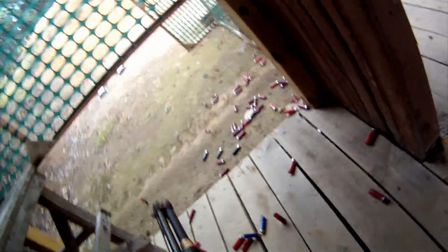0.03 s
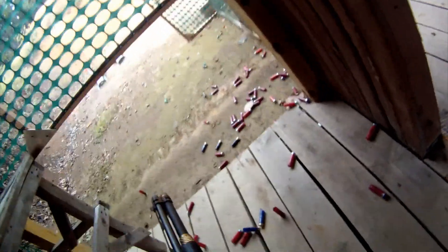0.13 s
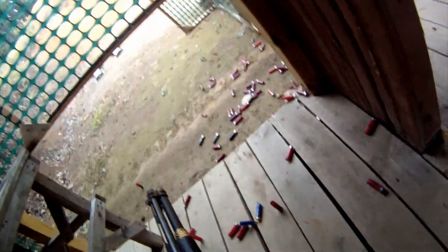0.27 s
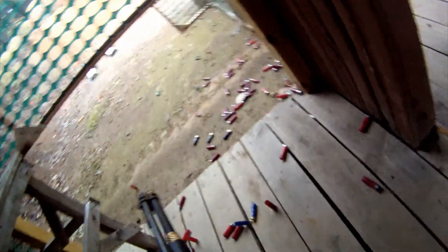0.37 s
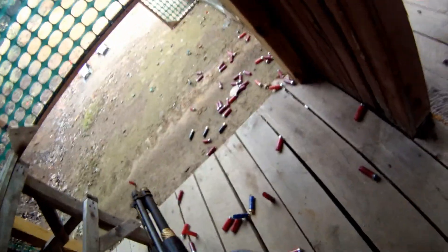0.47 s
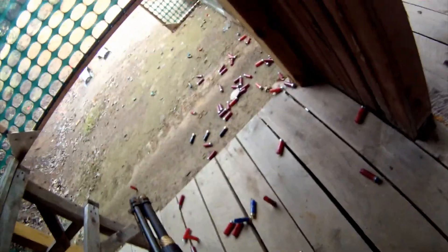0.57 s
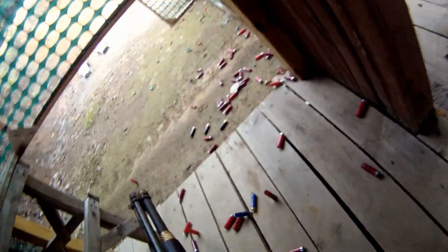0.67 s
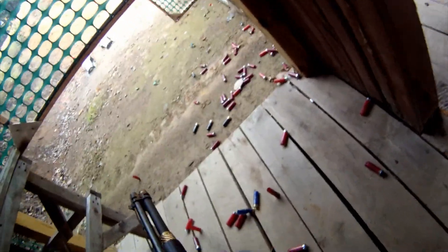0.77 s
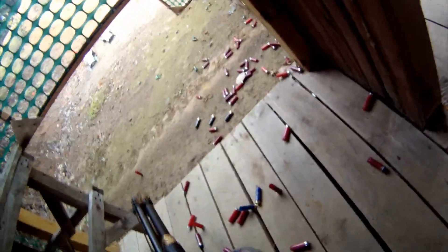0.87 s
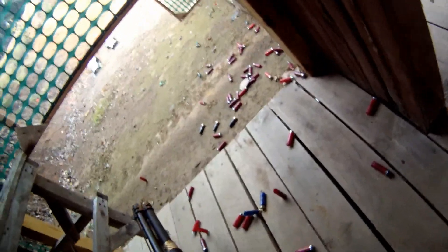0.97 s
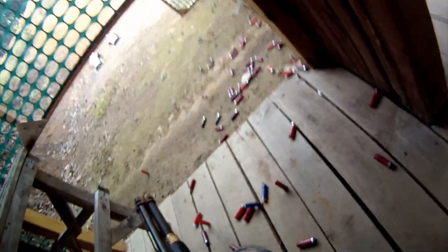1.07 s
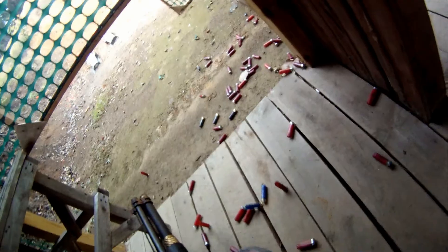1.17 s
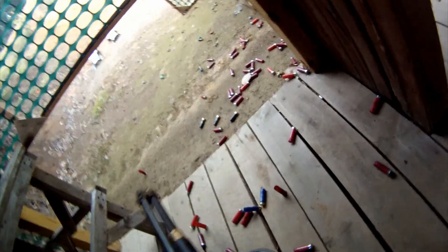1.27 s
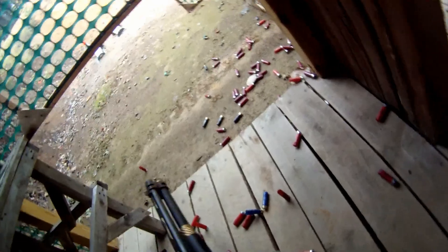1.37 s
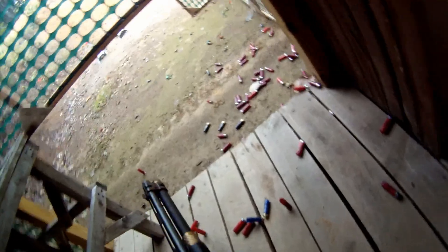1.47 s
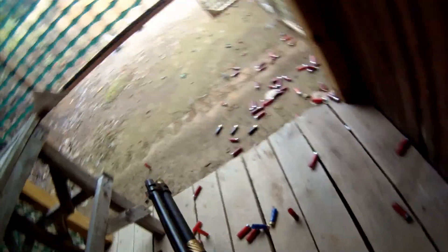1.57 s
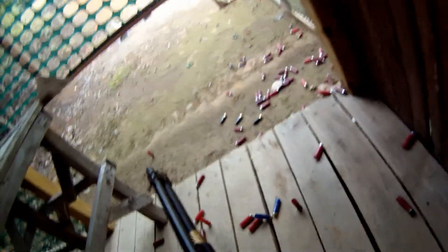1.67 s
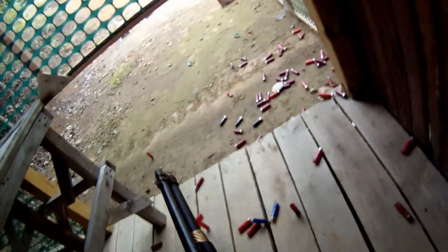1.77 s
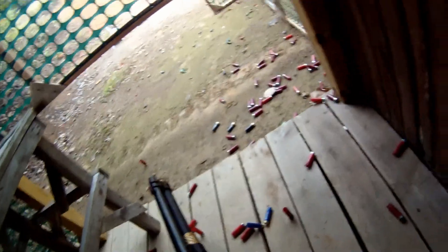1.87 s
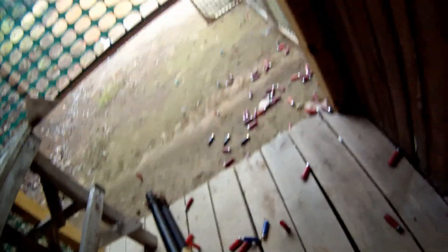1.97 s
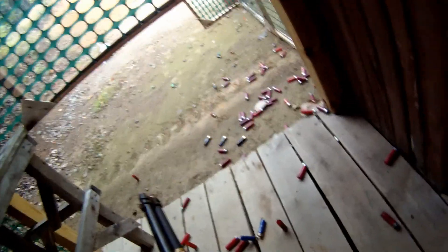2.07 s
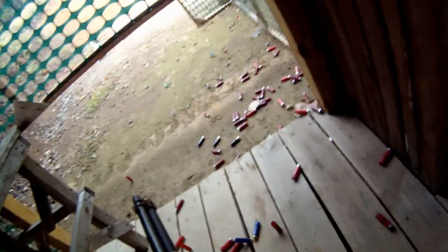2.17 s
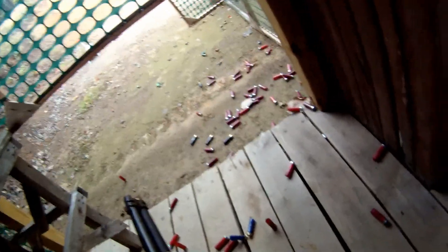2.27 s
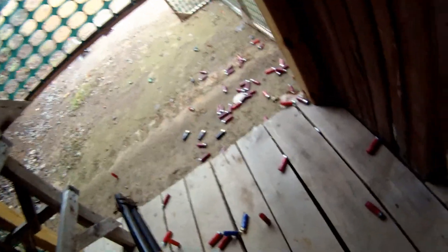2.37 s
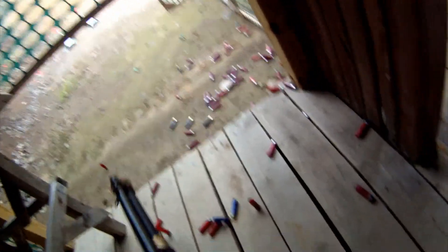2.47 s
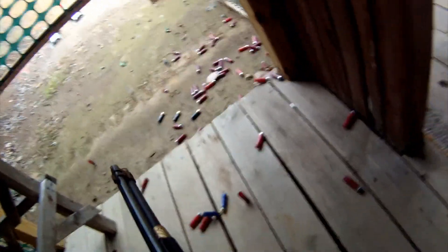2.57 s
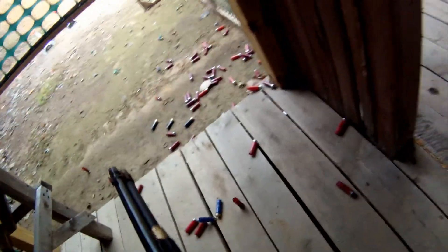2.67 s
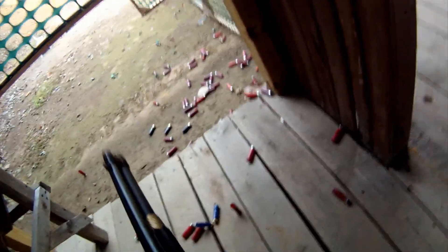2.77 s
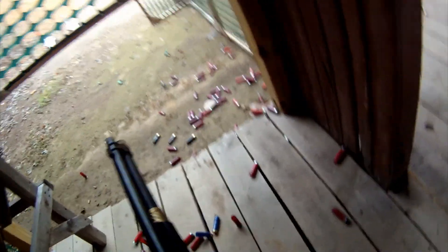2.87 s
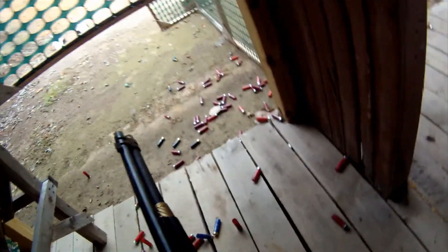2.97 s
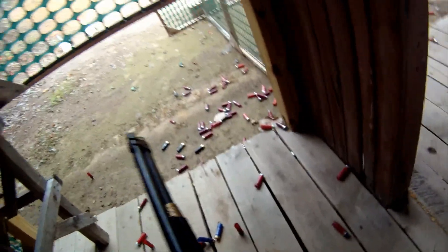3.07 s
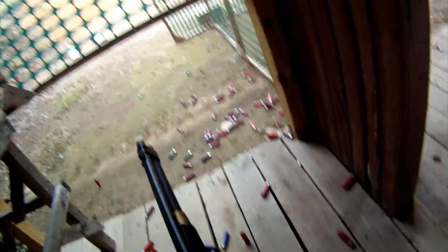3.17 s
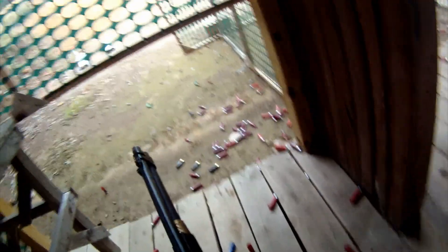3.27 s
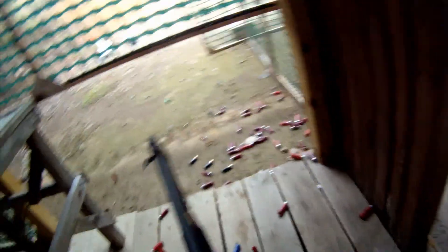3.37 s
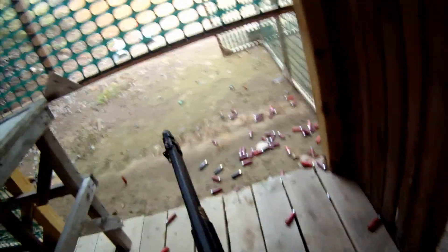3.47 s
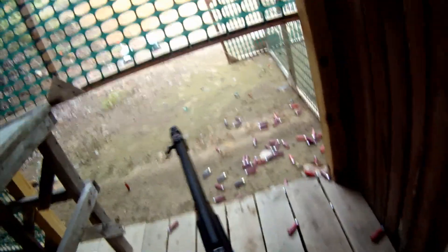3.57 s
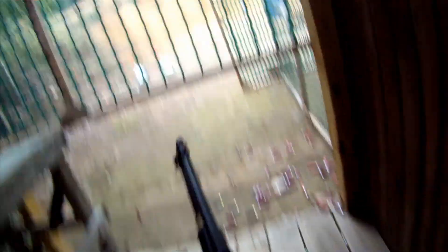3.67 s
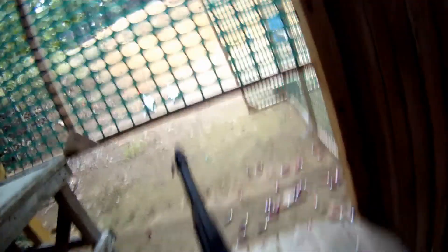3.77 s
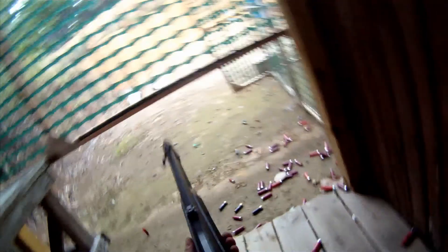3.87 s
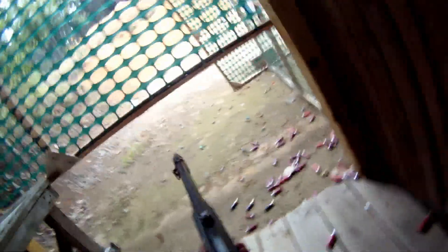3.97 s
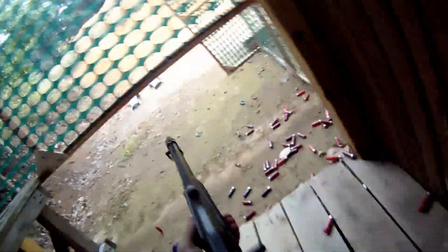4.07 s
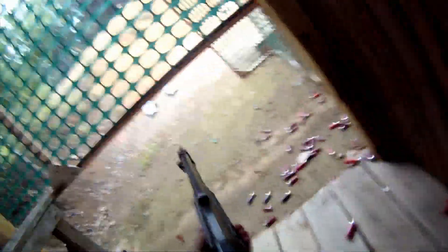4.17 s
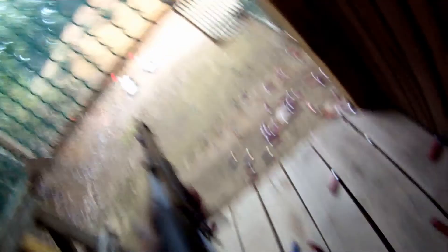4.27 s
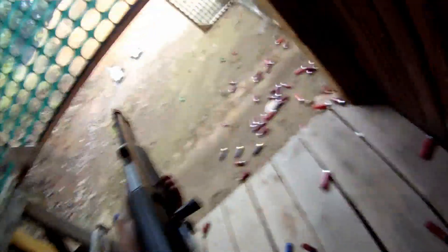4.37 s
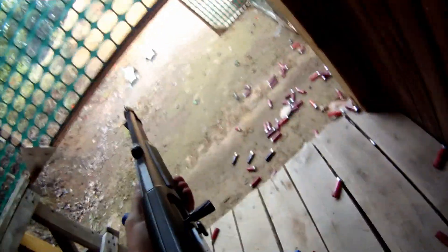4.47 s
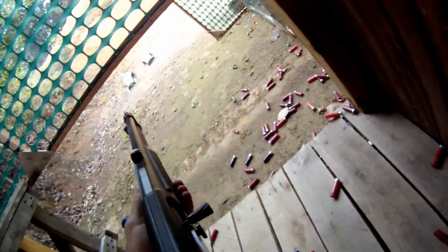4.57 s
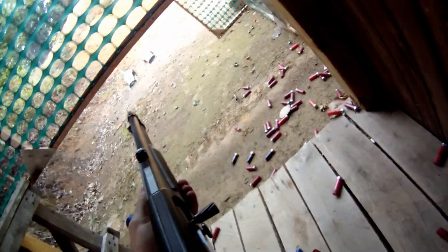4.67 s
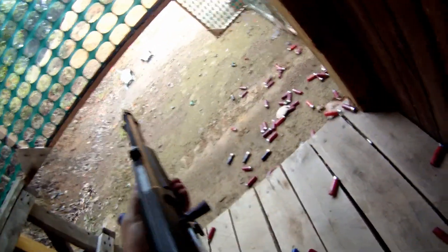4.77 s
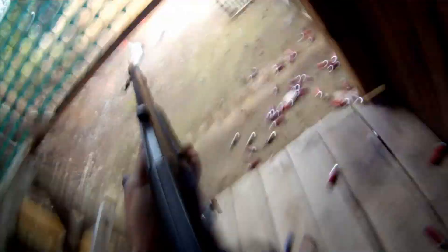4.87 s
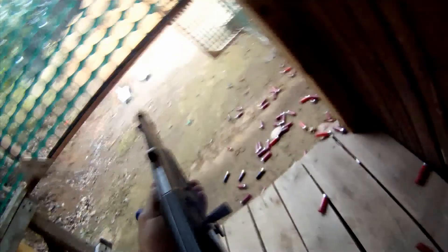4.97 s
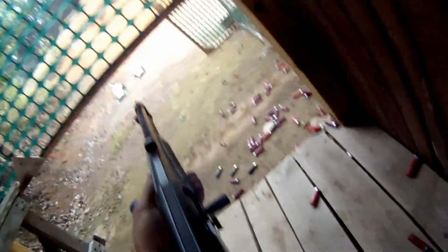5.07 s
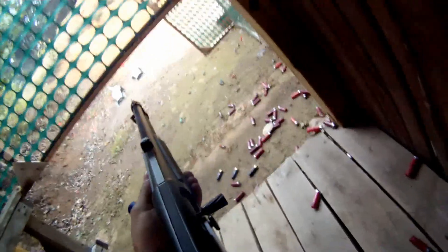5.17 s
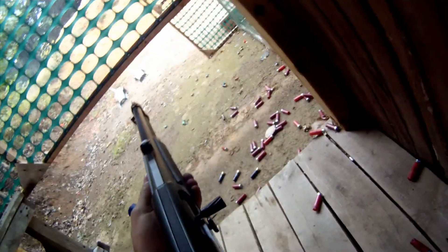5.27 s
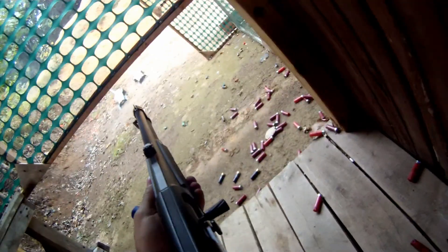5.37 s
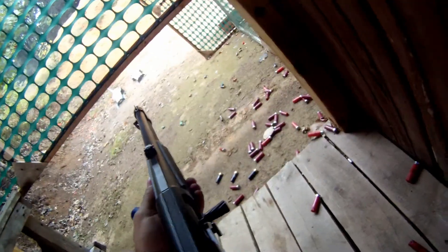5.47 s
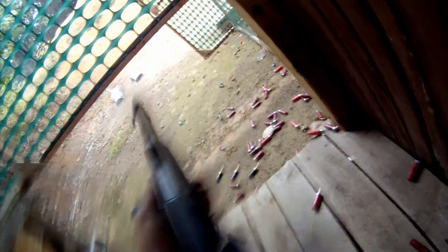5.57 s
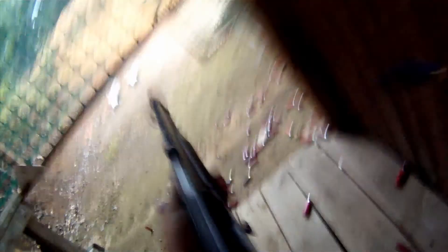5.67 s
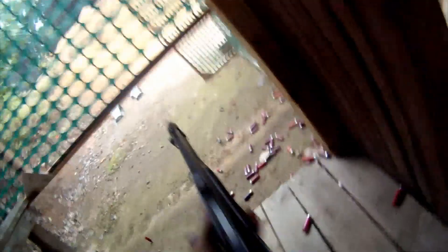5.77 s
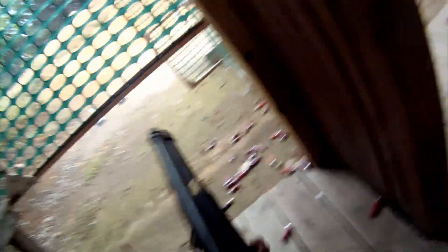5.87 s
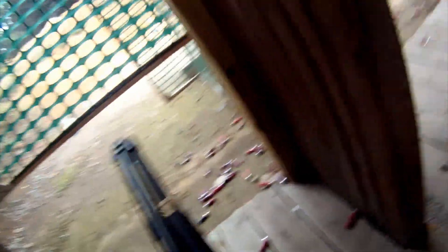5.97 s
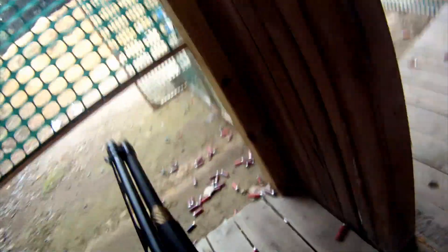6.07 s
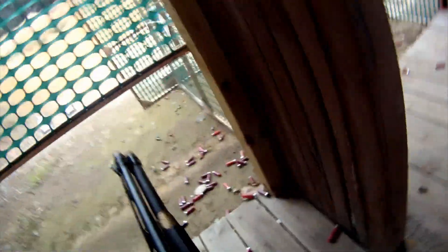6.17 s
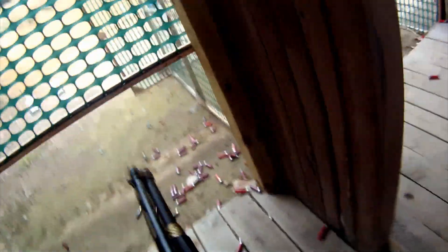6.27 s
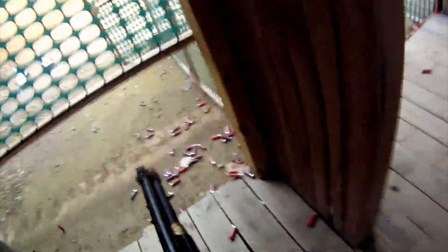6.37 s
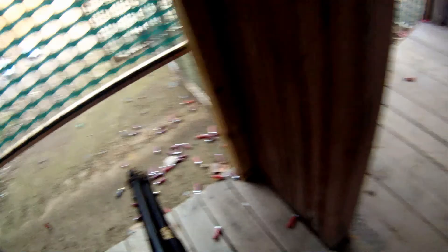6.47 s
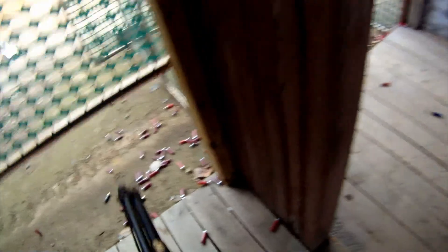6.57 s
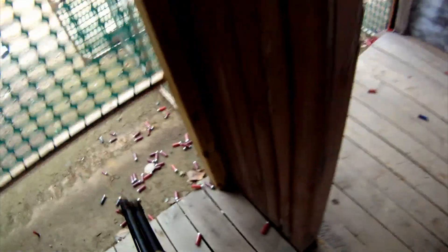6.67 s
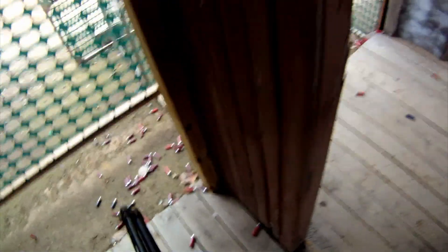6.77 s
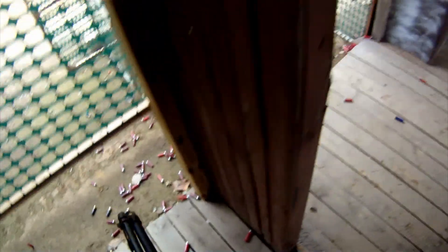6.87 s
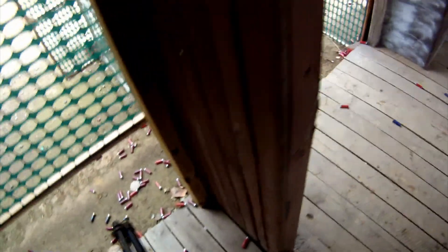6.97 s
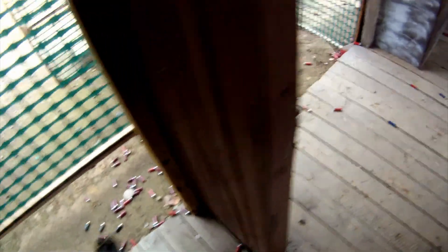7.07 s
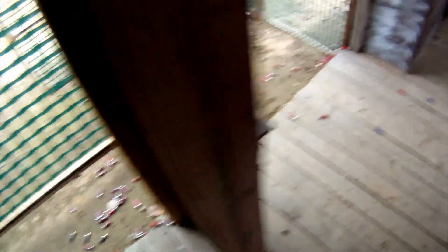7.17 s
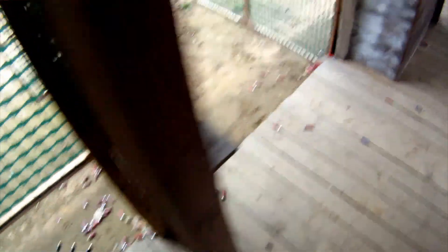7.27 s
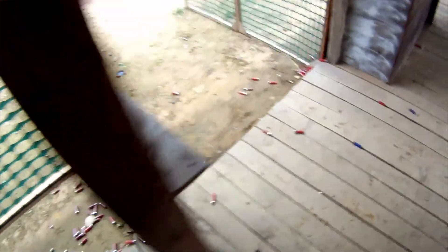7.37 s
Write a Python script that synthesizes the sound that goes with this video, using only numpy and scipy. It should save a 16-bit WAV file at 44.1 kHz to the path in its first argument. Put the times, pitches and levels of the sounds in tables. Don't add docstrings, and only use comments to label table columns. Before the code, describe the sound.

Gun handling clacks and clinks on a wooden range stand, then two overloading shotgun blasts crack and roll away, followed by more metallic clatter.

```python
import sys
import numpy as np
from scipy import signal
from scipy.fft import rfft, irfft, next_fast_len
from scipy.io import wavfile
from scipy.ndimage import map_coordinates

SR = 44100
rng = np.random.default_rng(int(sys.argv[2]) if len(sys.argv) > 2 else 0)


def digitize_waveform(pressure):
    field = np.atleast_2d(pressure).T
    bounded = np.clip(field, -1, 1)
    quanta = np.round(bounded * 32767).astype(np.int16)
    wavfile.write(sys.argv[1], SR, quanta)


def rack_gain(trim_db):
    fader = np.asarray(trim_db, float)
    return 10 ** (fader / 20)


N = 327857
SPREAD_DB = 1.5


def unit(x):
    return x / np.sqrt(np.mean(x ** 2) + 1e-20)


def seconds(size):
    return np.arange(size) / SR


def sine(hz, t):
    return np.sin(2 * np.pi * hz * t)


def along(points, hz):
    f, v = np.transpose(points)
    return np.interp(np.log(hz + 1), np.log(f + 1), v)


def shade(points):
    return lambda hz: rack_gain(along(points, hz))


def curves(rows, t):
    s, *cols = np.transpose(rows)
    return [np.interp(t, s, c) for c in cols]


def wobble(size, rate):
    knots = rng.standard_normal(int(size * rate / SR) + 4)
    return map_coordinates(knots, [np.arange(size) * rate / SR])


def noise_pair(size):
    return rng.standard_normal((2, size))


# f/Hz, correlation
ALIKENESS = [(30, 0.43), (60, 0.5), (130, 0.94), (290, 1), (640, 0.9), (1410, 0.75), (3100, -0.42),
             (6820, -0.36), (15000, 0.025)]


def rush(white, gain, most_alike=1.0):
    hz = np.fft.rfftfreq(white.shape[1], 1 / SR)
    turn = np.arccos(np.clip(along(ALIKENESS, hz), -1, min(most_alike, 1))) / 2
    mid, side = irfft(rfft(white) * gain(hz) * [np.cos(turn), np.sin(turn)], white.shape[1])
    return unit(np.array([mid + side, mid - side]))


def reshape_by_pitch(sound, gain):
    f, frames, z = signal.stft(sound, SR, nperseg=256)
    return signal.istft(z * gain(f[:, None], frames), SR, nperseg=256)[1][:, :sound.shape[1]]


def add(out, s, sound):
    part = out[:, round(s * SR):][:, :sound.shape[1]]
    part += sound[:, :part.shape[1]]


def sides(pan_db):
    half = np.clip(pan_db, -8, 8) / 2
    return rack_gain([[half], [-half]])


def somewhere():
    return sides(SPREAD_DB * rng.standard_normal())


def steady(colour):
    return rush(noise_pair(next_fast_len(N)), shade(colour))[:, :N]


# f/Hz, level/dB per Hz
BREEZE_COLOUR = [(5, -13.5), (11, 2), (22, -1), (43, -18), (58, -16.5), (75, -47), (130, -120)]


def breeze():
    breeze_db, gusts_db = -57, 3
    return rack_gain(breeze_db + gusts_db * wobble(N, 3.2) + wobble(N, 9.9)) * steady(BREEZE_COLOUR)


# f/Hz, level/dB per Hz
DRONE_COLOUR = [(32, -40), (55, -8), (70, -1), (86, -1), (131, -7), (183, -16.5), (300, -20), (450, -23.5),
                (900, -40), (2500, -120)]
# t/s, shaft f/Hz
ENGINE_SPEED = [(0, 43.4), (.8, 41.37), (1.5, 38.04), (2.3, 36.56), (4.9, 31.4)]
# multiple of the shaft rate, level/dB over the drone
ENGINE_TONES = [(2, -3), (3, -9)]


def far_engine():
    t = seconds(N)
    start_db, recedes_db_per_s = -61.5, 1.5
    drone_db = start_db - recedes_db_per_s * np.minimum(t, SHOTS[0][0])
    shaft_hz = curves(ENGINE_SPEED, t)[0] * (1 + 0.018 * wobble(N, 15.0))
    turns = 2 * np.pi * np.cumsum(shaft_hz) / SR
    hum = sum(rack_gain(db + 3.1 * wobble(N, 6.7)) * np.sin(k * turns) for k, db in ENGINE_TONES)
    return rack_gain(drone_db + wobble(N, 5.0)) * (rack_gain(-3.5) * steady(DRONE_COLOUR) + hum)


# t/s, clothing level/dB
MOVEMENT = [(0, -65.5), (.3, -84), (.5, -72.5), (.84, -75), (1.03, -71.5), (1.2, -73), (1.35, -58),
            (1.5, -71.5), (1.89, -75), (2.1, -86.5), (2.32, -84.5), (2.65, -67.5), (2.81, -69),
            (3.05, -77.5), (3.38, -68.5), (3.9, -74.5), (4.3, -69.5), (4.72, -85)]
# f/Hz, level/dB per Hz
CLOTH_COLOUR = [(150, -37), (250, -9), (286, -6), (393, -10), (467, -4.5), (780, -5.5), (1060, -5),
                (2900, -13), (3770, -52), (6380, -120)]
# f/Hz, level/dB per Hz
AIR_COLOUR = [(1590, -39), (2700, -7), (3340, 1), (4530, -1.5), (6630, -1), (10800, -6.5), (14500, -12.5),
              (15400, -16)]


def clothing_and_air():
    t = seconds(N)
    cloth_db, = curves(MOVEMENT, t)
    cloth = rack_gain(cloth_db + 1.2 * wobble(N, 14) + 3.1 * wobble(N, 81)) * steady(CLOTH_COLOUR)
    still_db, stirred_db, growth = -88.5, -8.5, 2.6
    air = rack_gain(still_db) + rack_gain(-65.5 + stirred_db + growth * (cloth_db + 67.0))
    air = np.where(t > SHOTS[0][0], rack_gain(-81.5), air)
    return cloth + rack_gain(6.5) * air * steady(AIR_COLOUR)


# t/s, slips per s, level/dB
BOARD_CREAK = [
    (7.08, 290, -88.5),
    (7.12, 300, -71.5),
    (7.19, 295, -61),
    (7.24, 284, -47.5),
    (7.28, 295, -52),
    (7.32, 250, -84),
]


def floor_board():
    rate, db = curves(BOARD_CREAK, seconds(N))
    phase = 2 * np.pi * np.cumsum(rate * (1 + 0.019 * wobble(N, 60))) / SR
    groan = sum(rack_gain(3 * wobble(N, 26) - 5.7 * k) * np.sin(k * phase) for k in range(1, 5))
    return rack_gain(db) * groan


# t/s, half length/s, f/Hz, width/Hz,
# level/dB
DRAGS = [(0.082, 0.093, 300, 120, -73), (.57, 0.066, 380, 390, -71), (.864, 0.024, 286, 131, -67),
         (1.028, 0.068, 4300, 11000, -61.5), (1.035, 0.069, 1300, 1500, -59), (1.1, 0.052, 220, 100, -66.5),
         (1.317, .0047, 1400, 1360, -42.5), (1.328, 0.022, 180, 204, -48.5), (1.54, 0.06, 930, 500, -60.5),
         (1.85, 0.045, 1020, 1100, -62), (1.851, .015, 3600, 500, -76), (2.209, .02, 300, 320, -72),
         (2.472, .04, 220, 200, -70), (2.827, .022, 1700, 900, -71), (2.998, 0.014, 380, 350, -64),
         (3.1, 0.035, 1510, 1000, -66), (3.156, 0.026, 1630, 700, -54), (3.18, .035, 8550, 9400, -50),
         (3.2, 0.051, 145, 70, -62.5), (3.1, 0.038, 523, 324, -66), (3.879, 0.044, 190, 200, -67.5),
         (4.059, .02, 9000, 6000, -72), (4.301, 0.091, 23, 27, -49), (4.309, 0.034, 170, 130, -66.5),
         (4.55, .03, 380, 200, -77), (5.07, .035, 11500, 3500, -30.5), (5.296, .004, 9000, 14000, -44.5),
         (5.567, .0026, 5000, 5000, -50), (6.136, 0.038, 215, 46, -46), (6.243, .004, 9000, 9000, -57),
         (6.255, .02, 7990, 9000, -63), (6.06, .012, 12000, 6000, -57), (6.118, .004, 10000, 9000, -54),
         (6.132, .012, 10000, 8000, -58), (6.447, 0.022, 162, 68, -46.5), (7.145, .0425, 730, 591, -56.5),
         (7.22, .065, 52, 64.8, -53.5), (7.221, .07, 400, 310, -59.5), (7.255, .04, 3056, 5500, -59.5)]


def scrapes():
    out, size = np.zeros((2, N)), 2 ** 14
    lead = .15
    t = seconds(size) - lead
    for s, half, centre_hz, width_hz, db in DRAGS:
        band = lambda hz: 1 / (1 + (2 * (hz - centre_hz) / width_hz) ** 2)
        drag = rush(noise_pair(size), band) * rack_gain(2.2 * wobble(size, 80))
        drag = rack_gain(db) * np.exp(-(t / half) ** 2) * np.hanning(size) ** .25 * drag
        add(out, max(s - lead, 0), drag[:, round(max(lead - s, 0) * SR):])
    return out


# t/s, peak level/dB, f/Hz
CLICKS = [(1.3225, -34, 4500), (1.3255, -28, 5000), (1.33, -28, 6000), (2.4465, -62, 4000),
          (2.6763, -36, 9000), (2.683, -44, 10000), (2.863, -44, 5000), (6.984, -45, 2400),
          (4.181, -56, 11000), (3.748, -50, 2820), (3.904, -60, 2500), (4.1, -53, 2200), (4.311, -53, 2500),
          (4.41, -59, 2500), (5.5725, -48.5, 6000), (6.634, -31.5, 1890), (1.327, -24.5, 896),
          (2.761, -44, 1700), (6.501, -50, 9000), (6.509, -52, 8000), (6.861, -62, 2960),
          (6.904, -57, 2795), (6.935, -40, 2590), (7.3933, -38, 3480), (7.3985, -32, 4000)]


def snaps():
    out, t = np.zeros((2, N)), np.arange(-SR // 500, SR // 500) / SR
    for s, db, hz in CLICKS:
        click = sine(hz, t) * np.exp(-(1.1 * hz * t) ** 2)
        add(out, s + t[0], rack_gain(db) * somewhere() * click)
    return out


# t/s, peak level/dB, f/Hz
SMALL_PARTS = [(.981, -54, 1110), (1.021, -51, 1070), (1.171, -57, 1700), (1.183, -43, 10200),
               (1.19, -45, 1520), (1.255, -47, 5810), (1.265, -35.5, 11000), (1.266, -50, 7410),
               (1.277, -36, 1900), (1.295, -46, 10940), (1.321, -27, 1760), (1.326, -30, 5700),
               (1.336, -32, 12000), (1.342, -37, 5440), (1.343, -39, 2080), (2.594, -62, 5210),
               (2.596, -64, 10980), (2.627, -53, 1580), (2.677, -62, 1420), (2.725, -60, 1980),
               (2.865, -44, 6600), (2.868, -39, 1690), (2.885, -42, 9650), (2.891, -43, 5800),
               (3.004, -52, 6000), (3.133, -63, 1580), (3.156, -55, 8250), (3.172, -49, 10160),
               (3.175, -50, 4270), (3.213, -36, 4280), (3.219, -29.5, 2060), (3.225, -35, 2010),
               (3.235, -31, 1900), (3.263, -49, 1790), (3.414, -55, 1750), (3.456, -51, 1740),
               (3.591, -51, 6760), (3.667, -58, 1380), (3.743, -45, 7880), (3.746, -51, 5700),
               (3.903, -76, 2400), (4.24, -54, 10700), (4.312, -60, 2080), (5.574, -44, 3500),
               (5.573, -50, 5400), (5.584, -49, 7800), (6.504, -54, 1824), (6.509, -60, 5070),
               (6.512, -56, 9800), (6.559, -56, 4970), (6.642, -45, 3750), (6.642, -53, 7950),
               (6.69, -54, 1490), (2.441, -47, 940), (2.587, -55.5, 792), (6.943, -54, 4803),
               (6.990, -45, 6350), (7.011, -47.5, 5660), (7.398, -34, 2197), (7.399, -38, 8200)]


def chinks():
    rise = .0018
    out, u = np.zeros((2, N)), seconds(SR // 25) / rise
    for s, db, hz in SMALL_PARTS:
        start_angle = rng.uniform(0, 1.3, (2, 1))
        note = u * np.exp(1 - u) * np.sin(2 * np.pi * hz * rise * u + start_angle)
        add(out, s - 1.7 * rise, rack_gain(db) * somewhere() * note)
    return out


# t/s, peak level/dB, time to fall 60 dB/s, tilt/dB per octave
BRIGHT_TICKS = [(0.0743, -55, 0.16, -2), (0.5494, -64, 0.26, -3.5), (1.1715, -36, 0.33, -1.5),
                (1.2542, -31.5, 0.44, 1.5), (1.3006, -29, 0.42, -1.5), (1.3291, -14.5, 0.18, 0.5),
                (2.445, -62, 0.21, -6), (2.584, -51, 0.27, 3.5), (2.675, -44.5, .06, 5),
                (2.682, -41, 0.26, 5), (2.7687, -48, 0.12, -7), (2.866, -28.5, .19, 0.6),
                (2.9952, -46, 0.26, -0.5), (3.2077, -27, 0.22, -2.5), (3.4, -54.5, 0.32, -7.5),
                (3.573, -38.5, 0.21, 2), (3.731, -39.5, 0.16, 6.5), (3.74, -37, .16, 5.5),
                (4.102, -57.5, 0.05, -3.5), (4.1817, -49, 0.22, 6), (4.229, -49.5, 0.17, 6),
                (4.3122, -56, 0.052, -4), (4.4088, -50, 0.24, 5), (5.568, -37.5, 0.29, -8),
                (6.502, -41, 0.24, 1.5), (6.635, -37.5, 0.2, -2.5), (6.939, -36.5, 0.17, -6),
                (6.989, -38, 0.36, -3), (7.188, -48.5, 0.29, 4.5), (7.379, -42.5, 0.29, -7),
                (7.395, -27, 0.22, -2), (7.428, -33.5, .2, 2.5)]
# f/Hz, level/dB per Hz
BRIGHT_COLOUR = [(1590, -32), (2700, -7), (3010, -3), (4630, -3.5), (5640, -2.5), (6110, -4.5), (7020, -3),
                 (8550, -7), (10600, -4), (15400, -15.5)]


def ticks():
    out, size = np.zeros((2, N)), SR // 2
    t = seconds(size)
    rise, left_db, thin_hz = 0.01, 0.5, 4540
    for s, db, decay, tilt_db in BRIGHT_TICKS:
        thin = max(tilt_db, 0)
        ripple_db = 0.86 * wobble(size // 2 + 1, 350)
        colour = lambda hz: rack_gain(ripple_db + along(BRIGHT_COLOUR, hz) + tilt_db * np.log2(hz / 7000 + 0.011)
                                - 3.0 * thin / (1 + (hz / thin_hz) ** 12))
        swell = np.clip(t / (rise + .0001 * thin), 0, 1) ** 0.67
        fade = rack_gain(-60 * t / max(decay, .03))
        burst = rush(noise_pair(size), colour) * rack_gain(1.3 * wobble(size, 150))
        add(out, s - 0.21 * rise, rack_gain(db - 4.0) * sides(left_db) * swell * fade * burst)
    return out


# t/s, f/Hz, level/dB, time to fall 60 dB/s
STEEL_RINGS = [
    (2.88, 9640, -50, .3),
    (2.868, 8000, -52, .25),
    (3.285, 9570, -61, .35),
    (3.25, 785, -73.5, 8),
    (2.588, 10980, -64, .3),
    (2.588, 5210, -68, .2),
    (6.51, 4950, -71, .5),
    (2.9, 1700, -66, .5),
    (3.84, 960, -60, .25),
    (5.572, 7800, -57, .15),
]


def steel_rings():
    out = np.zeros((2, N))
    u = seconds(3 * SR // 2)
    for s, hz, db, decay in STEEL_RINGS:
        level = rack_gain(db - 60 * u / decay + 3.9 * wobble(len(u), 14))
        add(out, s, level * sine(hz, u)[None])
    return out


# f/Hz, level/dB per Hz
DULL_COLOUR = [(210, -46.5), (350, -10.5), (519, -15.5), (749, -4), (895, -6.5), (2160, -1), (2510, -3.5),
               (3300, -14.5), (4290, -47), (7260, -120)]
# f/Hz, level/dB per Hz
HOLLOW_COLOUR = [(120, -35.5), (300, -13.5), (750, -1.5), (1150, -4.5), (1800, -27)]
# delay/s, level/dB
NEAR_BOARDS = [(.0095, -6.5), (.015, -9), (.022, -11.5), (.031, -11), (0.048, -13.5)]


def knock(pitch_hz, decay, hollow_db, broad, hold):
    size = 2 ** 14
    t = seconds(size)
    low_hz, high_hz = .78 * pitch_hz, 1.4 * pitch_hz
    ring = 1.2 * sine(pitch_hz, t) + 0.4 * broad * sine(low_hz, t) + .9 * broad * sine(high_hz, t)
    edge = rack_gain(-15 - 60 * t / .012) * np.diff(rng.standard_normal(size + 1))

    def peak(hz):
        main = 1 / (1 + ((hz - pitch_hz) / (.11 * pitch_hz)) ** 2)
        second = 0.25 / (1 + ((hz - low_hz) / (.08 * pitch_hz)) ** 2)
        return rack_gain(along(DULL_COLOUR, hz)) * (broad + main + second)

    def fade(lag):
        return rack_gain(-60 * lag / max(decay, .03))

    hollow = rack_gain(hollow_db) * rush(noise_pair(size), shade(HOLLOW_COLOUR))
    sound = rush(noise_pair(size), peak) + hollow
    blow = (0.78 * ring + 0.45 * sound) * np.exp(-(t / hold) ** 3) * np.minimum(t / (.17 * hold), 1)
    wash = rack_gain(-9.5 + 1.8 * wobble(size, 120)) * fade(t) * np.minimum(t / 0.0042, 1) * sound
    for lag, board_db in NEAR_BOARDS:
        echo_db = board_db - 4.5 + rng.normal(0, 2.1, (2, 1))
        add(wash, lag, rack_gain(echo_db) * np.sqrt(fade(lag)) * blow)
    return blow + broad * edge + wash


# t/s, peak level/dB, f/Hz
FAINT_TAPS = [(0.538, -58.5, 1060), (.766, -63, 700), (.946, -60, 899), (1.738, -67, 848),
              (1.774, -61, 1120), (2.203, -69, 555), (2.373, -63, 924), (2.628, -57, 710), (2.7, -50, 497),
              (2.723, -60, 820), (3.842, -58, 890), (3.862, -53.5, 940), (3.903, -58, 900),
              (4.099, -64.5, 914), (4.141, -59.5, 867), (4.226, -72, 1050), (4.267, -50.5, 795),
              (4.865, -59, 847), (6.819, -69, 644), (6.905, -50, 520), (6.93, -52, 500), (7.105, -51, 850),
              (7.117, -60, 800), (7.139, -54, 750), (4.257, -60, 720)]
# t/s, peak level/dB, f/Hz, time to fall 60 dB/s
STEEL_CLACKS = [(3.127, -51.5, 1730, 0.3), (3.159, -44.5, 1640, 0.12), (3.171, -43, 1950, 0.1),
                (3.2042, -28, 1930, 0.21), (3.251, -35.5, 1787, 0.27), (6.633, -34.5, 1774, 0.18),
                (6.935, -36.5, 1758, 0.24), (6.9824, -37.5, 1880, 0.19), (7.375, -44, 1895, .6),
                (7.3938, -28, 1947, 0.23), (7.416, -36, 1640, .29)]
# t/s, peak level/dB, f/Hz, time to fall 60 dB/s
GUN_KNOCKS = [(1.169, -39, 1535, 0.31), (1.252, -35.5, 1600, 0.63), (1.291, -32, 1090, 0.33),
              (1.326, -18.5, 2030, 0.21), (1.364, -37.5, 820, 0.13), (2.436, -45, 1610, 0.214),
              (2.582, -43, 1510, 0.22), (2.759, -40, 1780, 0.19), (2.864, -37, 2330, 0.19),
              (2.995, -39.5, 1710, 0.17), (3.398, -49, 816, 1), (3.589, -46, 1270, 0.33),
              (3.732, -52, 1465, 0.16), (3.482, -54, 1760, .31), (4.309, -53.5, 1180, .12),
              (5.573, -39, 1529, 0.29), (6.634, -40, 1200, .2), (7.186, -49, 947.5, 0.27)]


def knocks():
    out = np.zeros((2, N))
    # hollow body in dB under the ring, share of broad colour, length of the blow in s
    rows = [(*row, -6, 0.36, 0.0037) for row in GUN_KNOCKS]
    rows += [(*row, -25.5, 0.39, 0.0045) for row in STEEL_CLACKS]
    rows += [(*row, 0.19, -9, .15, 0.0039) for row in FAINT_TAPS]
    for s, db, *part in rows:
        add(out, s - .0004, rack_gain(db - 0.77) * somewhere() * knock(*part))
    return out


# delay after the shot/s, swell before it/dB per s
ROLL_ARRIVAL = (0.27, 70)


def roll_db(t, near_db, near_fade, far_db, far_fade):
    arrival, swell = ROLL_ARRIVAL
    late = np.maximum(t - arrival, 0)
    power = rack_gain(2 * (near_db - near_fade * late)) + rack_gain(2 * (far_db - far_fade * late))
    return 10 * np.log10(power) - swell * np.maximum(arrival - t, 0)


# near level/dB, fade/dB per s, far level/dB, fade/dB per s
ROLL_LAYERS = [
    (-34.5, 53, -42.5, 14.5),
    (-24.5, 67.5, -51.5, 10.5),
    (-38, 79.5, -67.5, 6.5),
]
# f/Hz, level/dB per Hz
BOOM_COLOUR = [(12, -28.5), (20, -3.5), (27, -4), (70, 2), (107, -16.5), (178, -12.5), (200, -12),
               (260, -37), (440, -120)]
BODY_COLOUR = [(110, -26.5), (200, -4), (289, -11.5), (358, -7), (396, -7.5), (506, -1.5), (969, -10.5),
               (1920, -11.5), (2550, -14.5), (2850, -27), (3770, -53), (6380, -120)]
HISS_COLOUR = [(1590, -34), (2700, -3.5), (3010, -2), (5730, -6.5), (7340, -9.5), (11200, -10.5),
               (15400, -27.5)]


def far_roll(t, white):
    size = len(t)
    boom_db, body_db, hiss_db = (roll_db(t, *layer) for layer in ROLL_LAYERS)
    grain_db = .4 * wobble(size, 23) + .9 * wobble(size, 110)
    boom = rack_gain(boom_db) * rush(white[1], shade(BOOM_COLOUR))
    body = rack_gain(body_db + grain_db) * rush(white[2], shade(BODY_COLOUR))

    def air_loss(f, s):
        return rack_gain(np.maximum(-.3 * (f / 1000) ** 2 * (s - .15), -13))

    hiss = reshape_by_pitch(rush(white[3], shade(HISS_COLOUR)), air_loss)
    hiss = rack_gain(hiss_db + 7.5 + grain_db + 1.2 * wobble(size, 30)) * hiss
    return (boom + body + hiss) * np.clip(t / 0.04, 0, 1)


# f/Hz, level/dB per Hz
BLAST_COLOUR = [(15, -40), (25, -7.5), (33, -12), (96, -9), (125, -5), (274, -9), (322, -2.5), (410, -8.5),
                (536, -3.5), (760, -4.5), (824, -3.5), (2290, -9.5), (3340, -16.5), (10900, -20.5),
                (15400, -29.5)]
# f/Hz, time to fall 60 dB/s
STAND_DECAY = [(40, 0.4), (150, 0.25), (600, 0.3), (2000, 0.26), (6000, 0.3), (14000, 0.25)]
# f/Hz, time to full level/s
STAND_BUILDUP = [(100, 0.028), (400, 0.047), (1000, 0.041), (2200, 0.0036), (8000, 0.038)]
# f/Hz, level/dB under the blast
RINGING_PANELS = [(132, -19), (326, -13), (553, -16.5), (656, -19), (797, -16.5), (855, -18), (1095, -19.5)]


def ringing_stand(t, white, drive_db):
    def build_and_fade(f, s):
        build = np.clip(s / along(STAND_BUILDUP, f), .08, 1) ** 1.2
        return rack_gain(-60 * s / along(STAND_DECAY, f)) * build

    stand = reshape_by_pitch(rush(white[0], shade(BLAST_COLOUR), most_alike=0.82), build_and_fade)
    bright = lambda hz: hz / (hz + 1500) / (1 + (hz / 10500) ** 4)
    crack = rack_gain(-6.0 - 60 * t / 0.17) * rush(white[3, ::-1], bright)
    panels = sum(rack_gain(db + 3.5 * wobble(len(t), 40)) * np.sin(2 * np.pi * hz * t + rng.uniform(0, 6))
                 for hz, db in RINGING_PANELS)
    swell, decay = 0.067, 0.29
    stand = stand + panels * rack_gain(-60 * t / decay) * np.minimum(t / swell, 1) ** 1.2
    late = np.clip((t - .0028) / 0.0015, 0, 1)
    return (stand * np.minimum(0.5 + t / 0.44, 0.75) + crack) * rack_gain(drive_db) * late


# f/Hz, time to fall 60 dB/s, level/dB
FIRST_SWING = (790, .016, 8)


def muzzle_swing(t):
    hz, decay, db = FIRST_SWING
    swing = -rack_gain(db - 60 * t / decay) * sine(hz, t) * np.minimum(t / .0012, 1)
    return np.array([np.roll(swing, 6), swing])


def hammer(t, white):
    return rack_gain(-26.5 - 60 * t / .06) * (sine(780, t) + 0.2 * white[3])


# t/s, level/dB first shot, level/dB second, f/Hz
BANK_SLAPS = [(5.112, -17, -25, 536), (5.151, -19, -33, 560), (5.182, -17, -15, 510),
              (5.193, -17, -17.5, 400), (5.211, -9.5, -16, 526), (5.241, -19.5, -18.5, 500),
              (5.292, -43, -40, 617), (5.33, -26, -31, 501), (5.355, -28, -31.5, 519),
              (5.373, -24.5, -26.5, 521)]


def slap(t, db, hz):
    return rack_gain(db) * sine(hz, t) * t / 0.0052 * np.exp(1 - t / 0.0028)


# t/s, level/dB over the overload point
SHOTS = [
    (4.8940, 21.5),
    (5.6390, 20.5),
]


def shots():
    out, size = np.zeros((2, N)), 2 * SR
    t = seconds(size)
    place = rng.standard_normal((4, 2, size))
    for shot, (s, drive_db) in enumerate(SHOTS):
        white = 0.93 * place + 0.61 * rng.standard_normal(place.shape)
        add(out, s - .0072, hammer(t, white))
        add(out, s, muzzle_swing(t) + ringing_stand(t, white, drive_db) + far_roll(t, white))
        for when, *db, hz in BANK_SLAPS:
            add(out, s + when - SHOTS[0][0], slap(t[:SR // 20], db[shot], hz)[None])
    return out


def scene():
    background = breeze() + far_engine() + clothing_and_air()
    movement = floor_board() + scrapes()
    gear = snaps() + chinks() + ticks() + steel_rings() + knocks()
    return background + movement + gear + shots()


def roll_off(x):
    return signal.sosfilt(signal.butter(12, 15600, fs=SR, output="sos"), x)


def record(dry):
    size = next_fast_len(N)
    dip = 1 - 0.5 / (1 + ((np.fft.rfftfreq(size, 1 / SR) - 3100) / 250) ** 2)
    heard = irfft(rfft(dry, size) * dip, size)[:, :N]
    clipped = heard / (1 + np.abs(heard / 1.02) ** 10) ** (1 / 10)
    return roll_off(clipped)


dry = scene()
out = record(dry)
digitize_waveform(out)
```